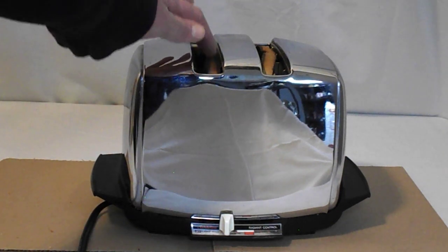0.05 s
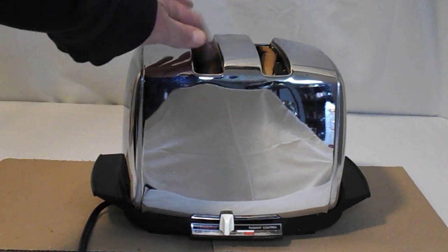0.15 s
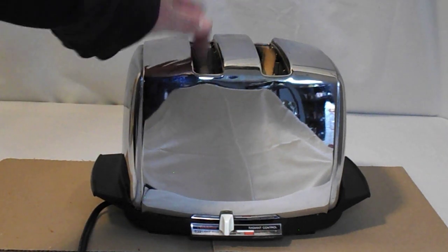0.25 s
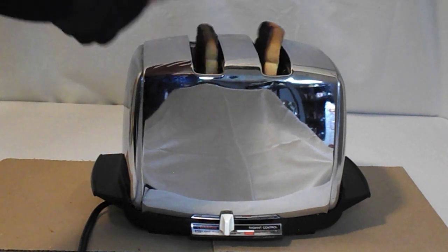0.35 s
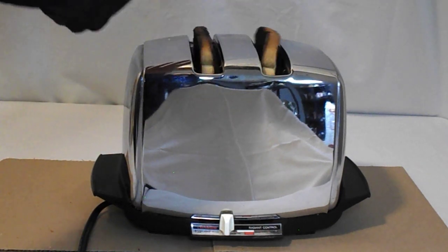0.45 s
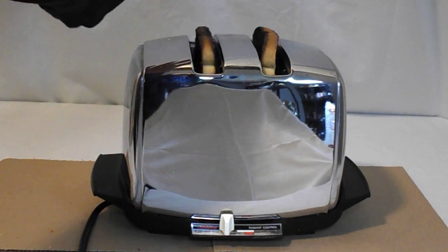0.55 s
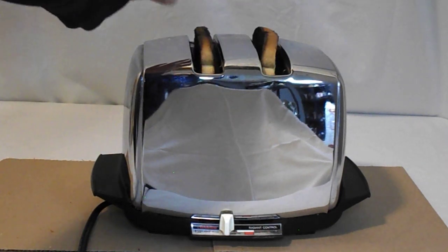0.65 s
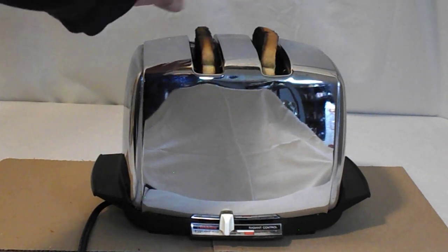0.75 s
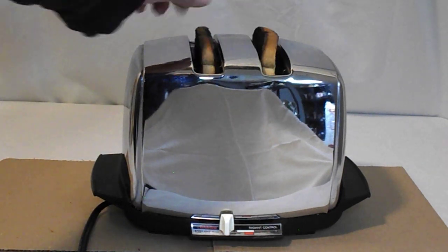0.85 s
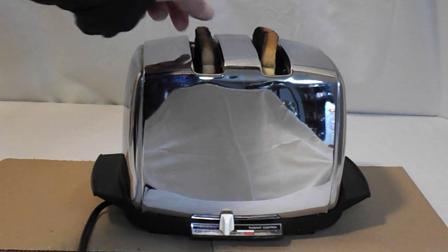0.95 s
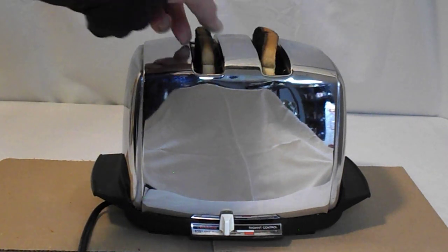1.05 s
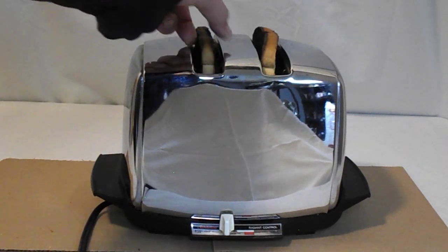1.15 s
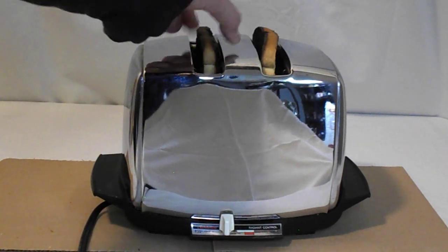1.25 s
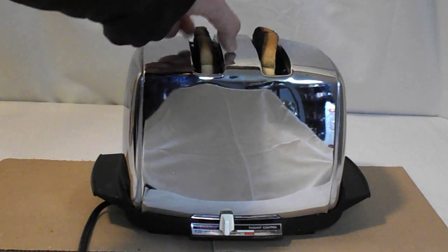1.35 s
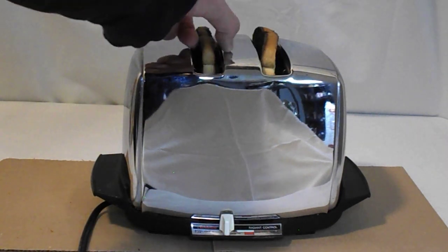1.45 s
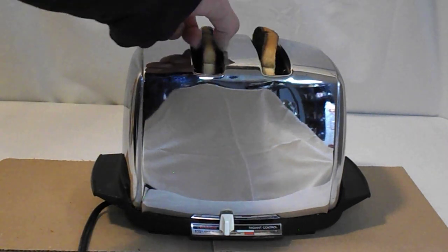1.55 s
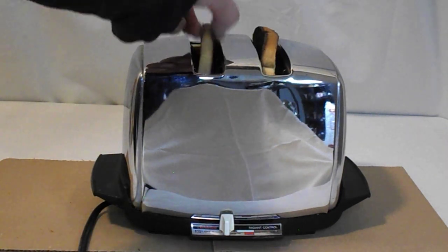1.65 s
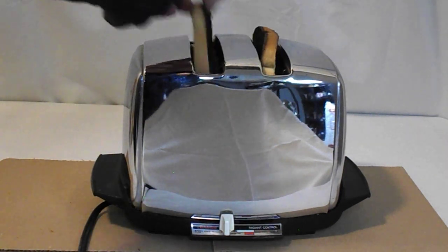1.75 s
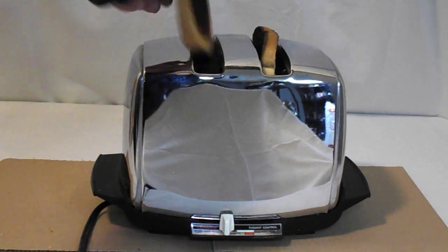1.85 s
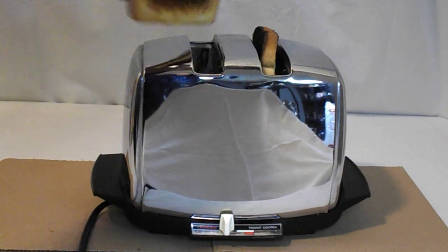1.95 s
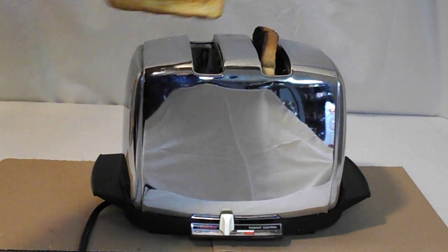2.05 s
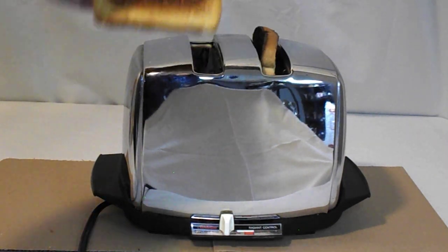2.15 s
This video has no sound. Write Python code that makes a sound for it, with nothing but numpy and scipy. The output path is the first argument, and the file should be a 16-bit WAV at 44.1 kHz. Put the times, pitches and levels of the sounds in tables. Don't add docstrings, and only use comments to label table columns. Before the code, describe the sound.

A metal toaster pops up with a clattering rattle, then a toast slice scrapes softly out

```python
import sys
import numpy as np
from scipy import signal
from scipy.fft import rfft, irfft, next_fast_len
from scipy.io import wavfile

SR = 44100
rng = np.random.default_rng(int(sys.argv[2]) if len(sys.argv) > 2 else 0)


def digitize_waveform(pressure):
    field = np.atleast_2d(pressure).T
    bounded = np.clip(field, -1, 1)
    quanta = np.round(bounded * 32767).astype(np.int16)
    wavfile.write(sys.argv[1], SR, quanta)


def boost_factor(decibels):
    exponent = np.asarray(decibels, float) / 20
    return 10 ** exponent


N = 97020
TIME_S = np.arange(N) / SR


def rms_one(x):
    return x / np.sqrt(np.mean(x ** 2) + 1e-20)


def shape(x, points):
    size = next_fast_len(len(x) + 4096)
    hz = np.maximum(np.arange(size // 2 + 1) * SR / size, 1)
    f, db = np.transpose(points)
    gain = boost_factor(np.interp(np.log(hz), np.log(f), db))
    gain = gain * np.minimum(hz / f[0], 1) ** 2
    gain = gain / np.sqrt(np.mean(gain ** 2))
    return irfft(rfft(x, size) * gain, size)[:len(x)]


def resonance(x, hz, width_hz):
    r = np.exp(-np.pi * max(width_hz, 5) / SR)
    turn = 2 * np.pi * hz / SR
    return signal.lfilter([(1 - r * r) / 2, 0, (r * r - 1) / 2], [1, -2 * r * np.cos(turn), r * r], x + 1e-18)


def ring(clicks, hz, t60_s):
    r, turn = boost_factor(-60 / (t60_s * SR)), 2 * np.pi * hz / SR
    return signal.lfilter([0, np.sin(turn)], [1, -2 * r * np.cos(turn), r * r], clicks + 1e-18)


def burst(start_s, level_db, t60_s, attack_s):
    t = np.maximum(TIME_S - start_s, 0)
    return boost_factor(level_db - 60 * t / max(t60_s, 0.01)) * (1 - np.exp(-t / attack_s))


def tone(hz):
    return np.sin(2 * np.pi * hz * TIME_S)


GRAINS_PER_S, GRAIN_SPREAD_DB = 11000, 2.5


def grains(per_s):
    sizes = boost_factor(GRAIN_SPREAD_DB * np.minimum(rng.exponential(1, N), 3))
    sizes = sizes * rng.choice([-1, 1], N)
    return rms_one(sizes * (rng.random(N) < per_s / SR))


STRIKE_SPREAD_DB = 3.0
ATTACK_SHARE = 0.013


def contacts(rows, colour, body, body_db):
    train = grains(GRAINS_PER_S)
    strikes_db = STRIKE_SPREAD_DB * rng.standard_normal((len(rows), len(body)))
    parts = np.array([train * burst(s, db, t60, ATTACK_SHARE * t60) for s, db, t60, *_ in rows])
    forces = boost_factor(strikes_db.T + body_db) @ parts
    modes = sum(boost_factor(db) * resonance(force, hz, width) for force, (hz, width, db) in zip(forces, body))
    return shape(parts.sum(axis=0), colour) + np.sqrt(SR / 8000) * modes, parts


# start_s [s], level_db [dB peak], t60_s [s],
# pitch_hz of the struck loose part [Hz], its ring_db [dB]
JOLTS = [(0.2131, -20.5, 0.085, 2740, -3.5), (0.2368, -31.5, 0.1, 2080, 5), (0.27, -29, 0.27, 3830, -22),
         (0.2775, -28.5, 0.33, 1870, -23), (0.3003, -19, 0.12, 4650, 5.5), (0.3104, -27, 0.11, 4020, 11),
         (0.3300, -35, 0.17, 2400, -11), (0.3496, -24.5, 0.13, 5300, 3), (0.3535, -26, .1, 4210, 6),
         (0.3597, -21, 0.12, 4630, 8.5), (0.368, -22.5, 0.13, 2350, -4), (0.378, -16, 0.068, 4730, 2),
         (0.3895, -30, 0.11, 3500, -6), (0.4053, -26, 0.11, 4700, -14), (0.417, -18, 0.13, 3170, -0.5),
         (0.456, -27, 0.17, 2100, -5), (0.436, -33, 0.15, 1150, 7), (0.5003, -26, 0.23, 2320, -16),
         (0.505, -35.5, 0.19, 2330, -12), (0.5362, -24, 0.12, 4700, 4), (0.5508, -26, 0.15, 4620, -24),
         (0.5686, -30.5, 0.21, 2120, -3), (0.6, -31, 0.072, 2170, -2), (0.6314, -37.5, 0.14, 2970, -6),
         (0.679, -37, 0.16, 2960, -26), (0.733, -42, 0.16, 2850, -6)]
# pitch_hz [Hz], level_db [dB per Hz]
RATTLE = [(530, -29), (900, -7), (1150, -2), (2400, -1.5), (4800, -5), (6500, -6.5), (8000, -15),
          (12000, -9.5)]
SHELL_HZ = [1134, 1717, 2341, 2392, 2763, 3583, 3721, 4226, 4271, 4694, 4743, 4850, 5255, 5706]
# width_hz [Hz], level_db [dB]
SHELL = [(60, -9.5), (34, -7.5), (29, -18), (28.4, -7), (30, -28), (30.8, -1.5), (31, -4.5), (30.5, -6),
         (30.7, -2), (29.6, -5), (30.8, -4), (29.6, -33), (25, -27), (29.4, -15)]
RATTLE_DB, SHELL_DB, RING_WIDTH_HZ = -14, 3, 720


def carriage():
    shell = [(hz, *rest) for hz, rest in zip(SHELL_HZ, SHELL)]
    out, parts = contacts(JOLTS, RATTLE, shell, SHELL_DB)
    loose = 0
    for part, (*_, hz, ring_db) in zip(parts, JOLTS):
        narrow = resonance(part, hz, RING_WIDTH_HZ)
        loose = loose + boost_factor(ring_db) * resonance(narrow, hz, 6 * RING_WIDTH_HZ)
    return boost_factor(RATTLE_DB) * (out + np.sqrt(SR / RING_WIDTH_HZ / 16) * loose)


# start_s [s], hum level_db [dB peak], boom_db [dB]
PUSHES = [(0.213, -46.5, -41.5), (0.273, -51.5, -38.5), (0.311, -56, -38), (0.356, -55, -37.5),
          (0.382, -44, -36.5), (0.423, -44.5, -41.5), (0.457, -76, -43.5), (0.507, -47, -38.5),
          (0.547, -41.5, -40), (0.587, -45, -53), (0.651, -47, -58), (1.693, -49.5, -53), (1.792, -54, -53),
          (1.838, -66, -56.5), (1.863, -66, -57), (1.892, -39.5, -54), (1.925, -55, -57),
          (1.980, -43.5, -47), (1.992, -42.5, -67), (2.024, -56, -67), (2.07, -62, -66), (2.1, -56, -57.5)]
PANEL_HZ = [437, 412]
# level_db [dB], t60_s [s]
PANELS = [(0.5, 0.19), (-9.5, 0.21)]
# pitch_hz [Hz], level_db [dB per Hz]
BOOM = [(180, -13), (330, -14), (430, -6), (560, 1.5), (720, -1), (860, -13), (1100, -4), (2000, -53)]
PUSH_S, PANEL_DB = 0.0027, -2
BOOM_DB, BOOM_ATTACK_S, BOOM_T60_S = -4.5, 0.011, 0.27


def panels():
    out = 0
    for hz, (level_db, t60_s) in zip(PANEL_HZ, PANELS):
        push = 0
        for s, db, _ in PUSHES:
            push = push + burst(s, db, 7 * PUSH_S, PUSH_S) * np.cos(2 * np.pi * hz * (TIME_S - s))
        out = out + boost_factor(level_db + PANEL_DB + 13.5) * ring(push / (PUSH_S * SR), hz, t60_s)
    boom = sum(burst(s, db + BOOM_DB, BOOM_T60_S, BOOM_ATTACK_S) for s, _, db in PUSHES)
    return out + shape(boom * rng.standard_normal(N), BOOM)


# start_s [s], length_s [s], from_hz [Hz], to_hz [Hz]
SQUEAK = (.5360, .032, 5150, 4690)
SQUEAK_DB, SQUEAK_FALL_S = -35.5, 0.006


def squeak():
    start_s, length_s, from_hz, to_hz = SQUEAK
    t = np.maximum(TIME_S - start_s, 0)
    hz = to_hz + (from_hz - to_hz) * np.exp(-t / SQUEAK_FALL_S)
    swell = np.sqrt(np.abs(np.sin(np.pi * np.minimum(t / length_s, 1) ** 0.6)))
    swell = swell * (t < length_s)
    return boost_factor(SQUEAK_DB + 2.5) * swell * np.sin(2 * np.pi * np.cumsum(hz) / SR)


# start_s [s], level_db [dB peak], crack_db [dB]
TAP = [
    (1.1610, -38, -27),
    (1.1640, -39, -40),
    (1.1685, -48, -50),
]
TAP_HZ = [441, 600, 738, 1065, 1141, 1410, 1488, 1696, 1868, 2051, 2444, 2627, 2745, 3941]
# level_db [dB], t60_s [s]
TAP_MODES = [(-8, .17), (-8, .05), (-10, .13), (-1, .04), (0, .13), (-1, .04), (0, .1), (-10, .1),
             (-13, .1), (-9, .06), (-15, .12), (-15, .13), (-13, .13), (-19, .12)]
TAP_TOUCHES_S, TAP_RING_DB = 0.0079, -11
TAP_CRACK_DB, TAP_CRACK_T60_S, TAP_CRACK_ATTACK_S = -21.5, 0.1, 0.0004


def tap():
    crack = sum(burst(s, db + TAP_CRACK_DB, TAP_CRACK_T60_S, TAP_CRACK_ATTACK_S) for s, _, db in TAP)
    out = crack * shape(grains(GRAINS_PER_S), RATTLE)
    for hz, (level_db, t60_s) in zip(TAP_HZ, TAP_MODES):
        mode_db = level_db + TAP_RING_DB
        touch = sum(burst(s, db + mode_db, TAP_TOUCHES_S, 0.00092) for s, db, _ in TAP)
        touch = touch * np.cos(2 * np.pi * hz * (TIME_S - TAP[1][0]))
        out = out + ring(touch / 20, hz, t60_s)
    return out


# start_s [s], level_db [dB peak], rub t60_s [s], wire ring_db [dB]
CATCHES = [(1.346, -60, 0.13, 1), (1.682, -49.5, 0.29, -5.5), (1.728, -48, 0.27, 7),
           (1.752, -54, 0.24, -13), (1.816, -46.5, 0.17, -1), (1.833, -42.5, 0.13, 5.5),
           (1.864, -48, 0.36, -1), (1.890, -40, 0.22, 2), (1.924, -41, 0.13, -13),
           (1.973, -34.5, 0.15, -32), (2.003, -64, 0.58, -16.5), (2.084, -52.5, 0.27, -23),
           (2.165, -59.5, 0.12, 5.5)]
# pitch_hz [Hz], level_db [dB per Hz]
RUB = [(500, -22), (900, -7), (1700, 0.5), (2600, -8.5), (4000, -2.5), (6500, -10.5), (9000, -13),
       (12000, -27)]
WIRE_HZ = [1135, 1645, 1700, 2110, 3010, 3140, 3740, 3915, 4100, 4250, 4770, 5300, 5720, 6340]
# width_hz [Hz], level_db [dB]
WIRES = [(40, -1.5), (31.5, -5), (29.6, -18), (27.2, -4), (26, 3.5), (29.7, 1), (35.4, 5), (35.2, 4),
         (24.4, 3), (24.8, -3), (30.5, 1.5), (43.2, -0.5), (30, -22), (35.7, 0)]
# pitch_hz [Hz], width_hz [Hz], level_db [dB]
THIN_WIRES = [(7280, 42, -20), (7900, 28, -10), (9330, 63, -7), (11000, 120, -7)]
RUB_DB, WIRES_DB = -12, 5.5


def slice_out():
    wires = [(hz, *rest) for hz, rest in zip(WIRE_HZ, WIRES)] + THIN_WIRES
    rings_db = WIRES_DB + np.array(CATCHES)[:, 3]
    rub, _ = contacts(CATCHES, RUB, wires, rings_db)
    return boost_factor(RUB_DB) * rub


# start_s [s], length_s [s], pitch_hz
# [Hz], level_db [dB rms]
SINGING = [(1.68, 0.029, 3725, -64), (1.718, .07, 3860, -63), (1.742, .08, 4080, -62),
           (1.745, 0.13, 1710, -64.5), (1.743, 0.058, 2130, -65.5), (1.756, 0.054, 3140, -69),
           (1.83, 0.13, 2116, -57.5), (1.83, 0.079, 3020, -62), (1.832, 0.042, 3890, -61),
           (1.859, 0.056, 1202, -59.5), (1.884, 0.066, 1645, -54), (1.892, 0.068, 3740, -58),
           (1.895, 0.057, 4110, -59.5), (1.912, 0.042, 1135, -57), (1.924, 0.035, 1766, -62),
           (1.968, 0.033, 1100, -58), (1.684, 0.042, 180, -59.5), (1.839, 0.068, 437, -55),
           (1.92, 0.039, 436, -47.5), (2.025, 0.025, 439, -55.5), (2.07, 0.047, 436, -60.5),
           (0.53, 0.022, 675, -42.5), (0.581, .04, 441, -46)]
SINGING_ROUGH = 0.4


def singing():
    out = 0
    noises = rng.standard_normal((len(SINGING), N // 200 + 2))
    for (start_s, length_s, hz, db), noise in zip(SINGING, noises):
        swell = np.sin(np.pi * np.clip((TIME_S - start_s) / length_s, 0, 1) ** 0.74)
        flutter = 1 + SINGING_ROUGH * np.interp(np.arange(N) / 200, np.arange(len(noise)), noise)
        out = out + boost_factor(db + 1.5) * swell * flutter * tone(hz)
    return out


# start_s [s], level_db [dB peak], t60_s [s]
CRACKLES = [(0.2374, -52, 0.18), (0.2714, -48, 0.18), (0.299, -37.5, 0.13), (0.335, -40, 0.22),
            (0.3614, -41, 0.22), (0.411, -37.5, 0.16), (0.4545, -33.5, 0.082), (0.5016, -40.5, 0.19),
            (0.539, -39.5, 0.21), (0.5746, -51, 0.09), (0.631, -44, 0.045), (0.6814, -71, 0.13),
            (1.834, -55, .08), (1.865, -56, .06), (1.893, -63, .08), (1.924, -50, 0.094),
            (1.9734, -47.5, 0.097), (2.0862, -61, 0.11)]
# pitch_hz [Hz], level_db [dB per Hz]
CRACKLE = [(5000, -43), (6500, 6.5), (8000, -1.5), (12000, 1.5)]
CRACKLE_DB, CRACKLE_ATTACK_S = 4.5, 0.0021


def crust():
    force = sum(burst(s, db + CRACKLE_DB, t60, CRACKLE_ATTACK_S) for s, db, t60 in CRACKLES)
    return shape(force * grains(GRAINS_PER_S), CRACKLE)


# start_s [s], pitch_hz [Hz], level_db [dB], t60_s [s]
SPRING = [
    (0.58, 985, -59, 0.75),
    (0.6, 739.3, -62, 1.4),
    (0.85, 1012, -68, 1.3),
    (1.73, 6900, -59, 0.11),
    (1.73, 9265, -60.5, 0.2),
    (1.73, 10900, -62, 0.15),
]
COIL_HZ = [2762.6, 2767.4]
# level_db [dB], t60_s [s]
COIL = [(-57.5, 1.62), (-72.5, 2.5)]
COIL_S, COIL_DAMPED_S, COIL_DAMPED_T60_S = 0.58, 1.055, 1


def spring():
    coil = sum(burst(COIL_S, db, t60, 0.031) * tone(hz) for hz, (db, t60) in zip(COIL_HZ, COIL))
    coil = coil * boost_factor(-60 * np.maximum(TIME_S - COIL_DAMPED_S, 0) / COIL_DAMPED_T60_S)
    free = sum(burst(s, db, t60, 0.02 * t60) * tone(hz) for s, hz, db, t60 in SPRING)
    return np.sqrt(2) * (coil + free)


ROOM_T60_S, ROOM_DB, ROOM_DULL = 0.33, -15, 0.8


def room(x):
    t = np.arange(SR // 2) / SR
    tail = signal.lfilter([1], [1, -ROOM_DULL], rng.standard_normal(len(t)))
    tail = tail * boost_factor(-60 * t / ROOM_T60_S) * (t > 0.004)
    return boost_factor(ROOM_DB) * signal.fftconvolve(x, tail / np.sqrt(np.sum(tail ** 2)))[:N]


# pitch_hz [Hz], level_db [dB per Hz]
AIR = [(24, -65), (40, -19), (124, -6.5), (303, -6.5), (323, -9.5), (399, -7.5), (694, -12.5), (936, -14.5),
       (6500, -29.5), (8450, -59), (14300, -120)]
AIR_DB, HUM_HZ, HUM_DB = -60, 115, -73.5


def air():
    return boost_factor(AIR_DB) * shape(rng.standard_normal(N), AIR) + boost_factor(HUM_DB) * tone(HUM_HZ)


def scene():
    toaster = carriage() + slice_out() + singing() + tap() + crust()
    return (toaster + room(toaster) + panels() + spring() + squeak() + air())[None]


# pitch_hz [Hz], level_db [dB per Hz]
HISS = [(6000, -21), (7500, -7.5), (9300, -6), (11000, 2), (12000, -10.5)]
HISS_DB, HISS_GRAINS_PER_S = -73.5, 1100


def hiss():
    return boost_factor(HISS_DB) * shape(grains(HISS_GRAINS_PER_S), HISS)


# pitch_hz [Hz], level_db [dB]
TOP = [(6000, -0.5), (6600, -9), (7600, -8.5), (9300, -9.5), (10900, -10), (11500, -18), (12000, -58)]
NOTCH_HZ = [7000, 8500, 10000]
NOTCH_HALF_HZ = [437, 420, 430]
NOTCH_POWER = 1.17


def microphone(x):
    size = next_fast_len(N + 4096)
    hz = np.arange(size // 2 + 1) * SR / size
    gain = boost_factor(np.interp(hz, *np.transpose(TOP)))
    for notch_hz, half_hz in zip(NOTCH_HZ, NOTCH_HALF_HZ):
        gain = gain * np.tanh(np.abs(hz - notch_hz) / half_hz + 0.01) ** NOTCH_POWER
    return irfft(rfft(x, size) * gain, size)[:, :N]


def band_limit(x):
    return signal.sosfilt(signal.butter(12, 11800, fs=SR, output="sos"), x)


def record(dry):
    mix = microphone(dry + hiss())
    return band_limit(mix)


dry = scene()
out = record(dry)
digitize_waveform(out)
```